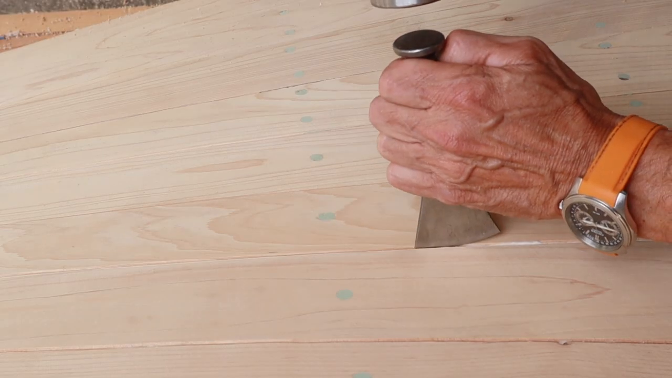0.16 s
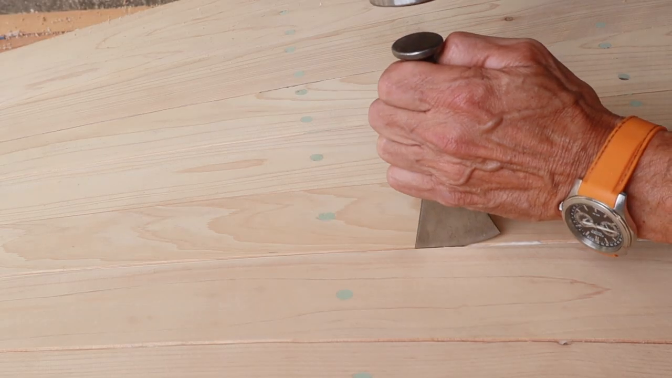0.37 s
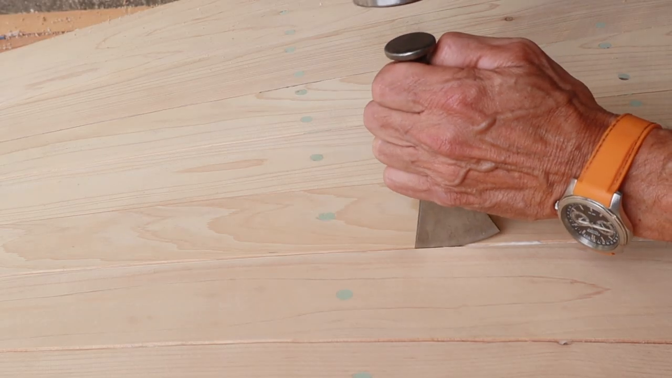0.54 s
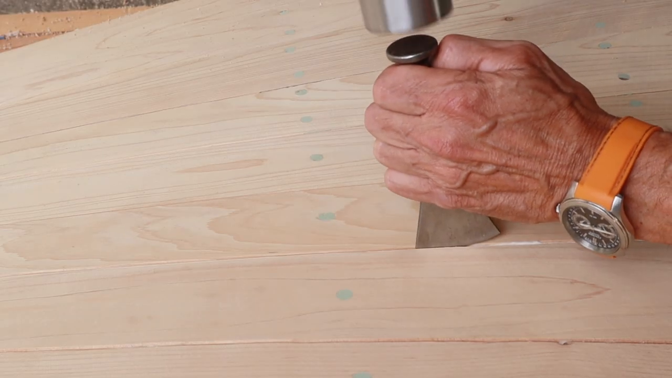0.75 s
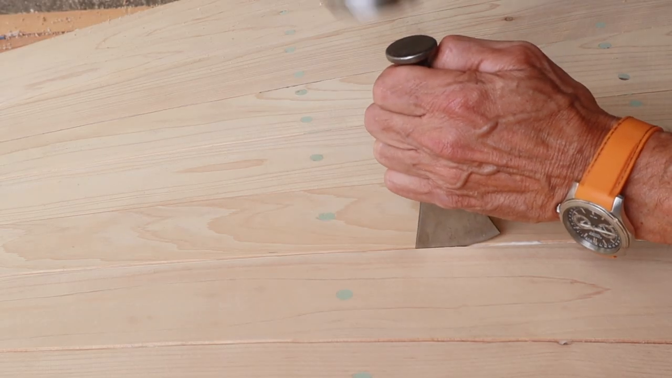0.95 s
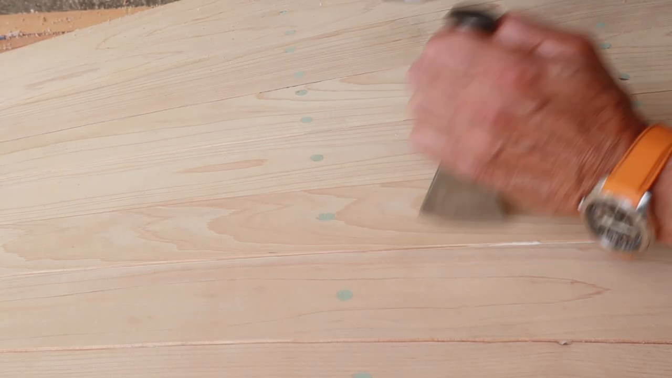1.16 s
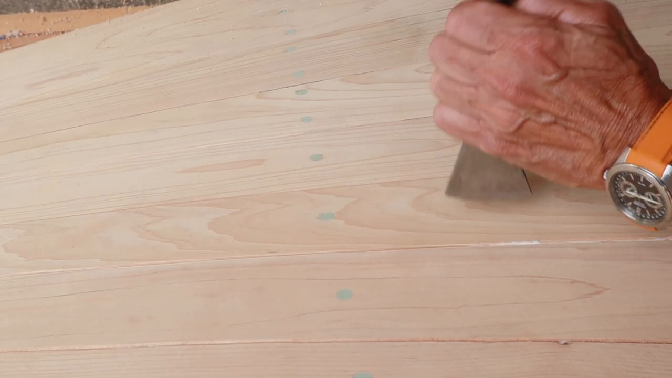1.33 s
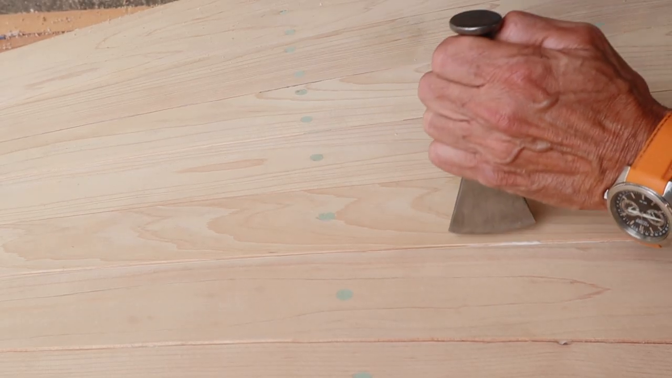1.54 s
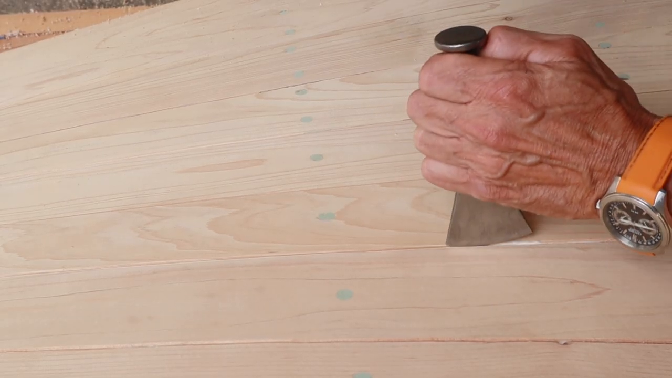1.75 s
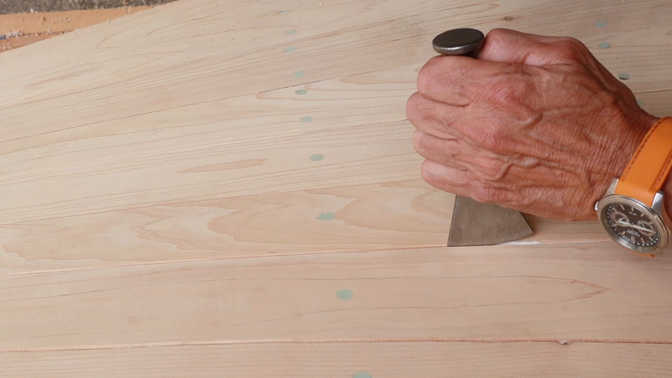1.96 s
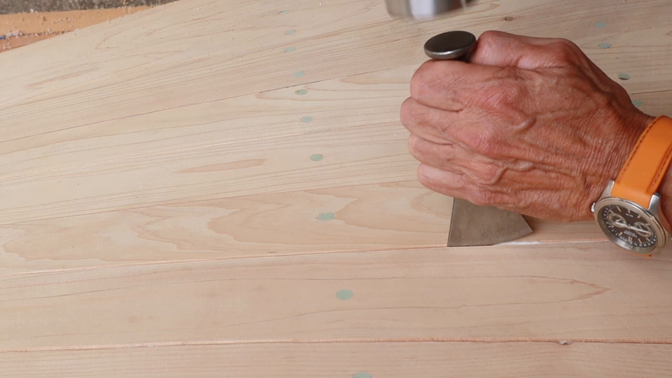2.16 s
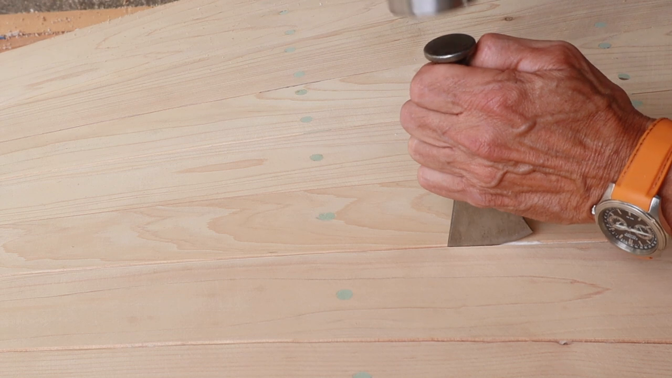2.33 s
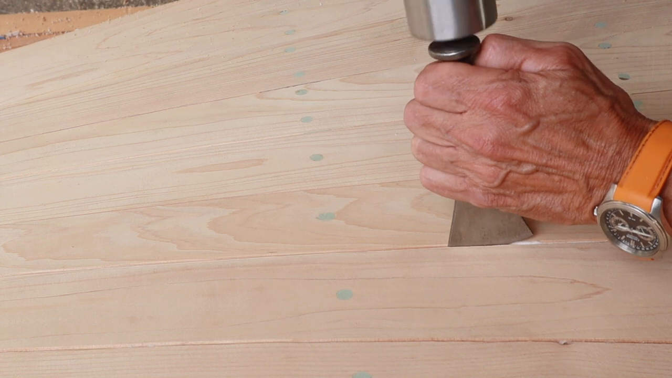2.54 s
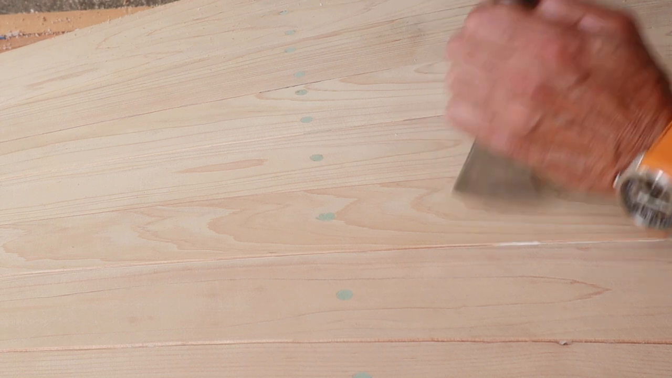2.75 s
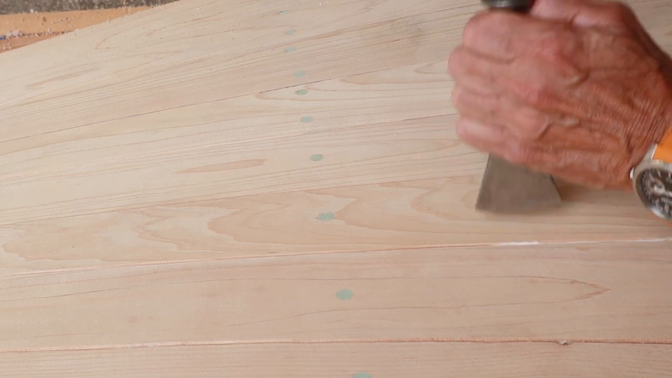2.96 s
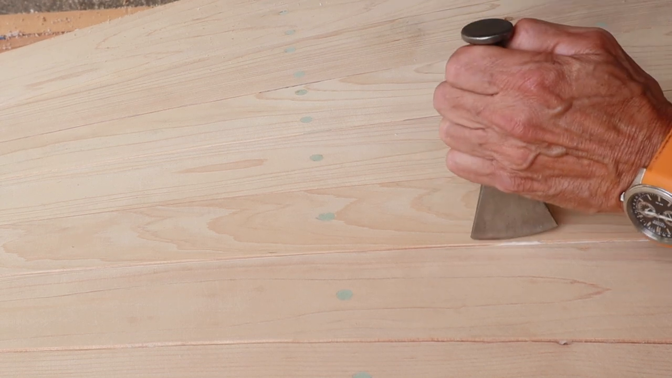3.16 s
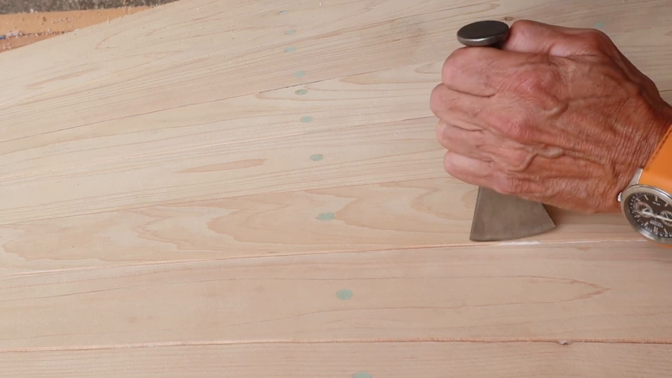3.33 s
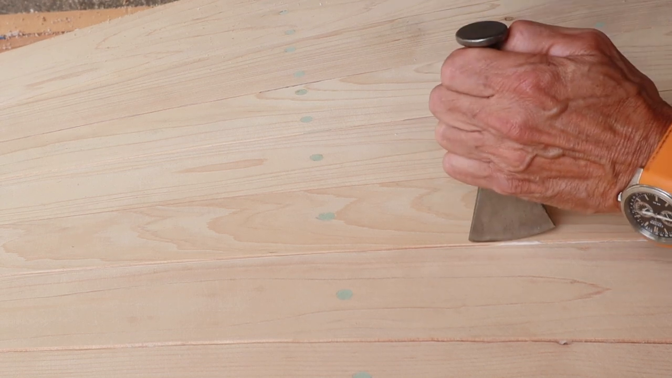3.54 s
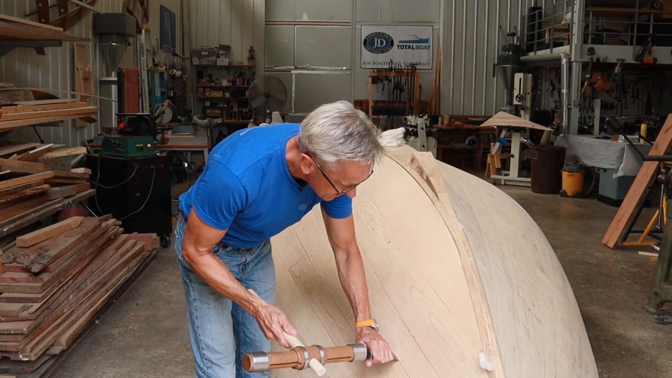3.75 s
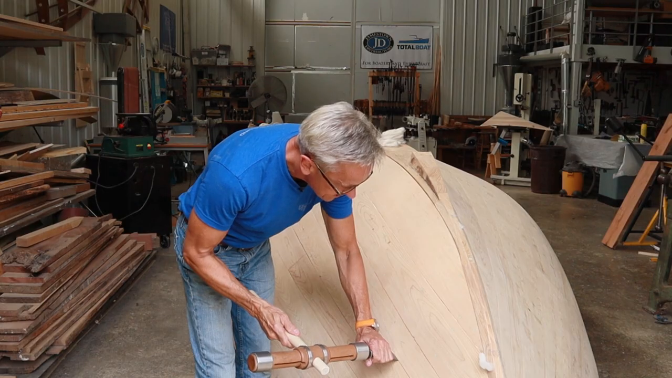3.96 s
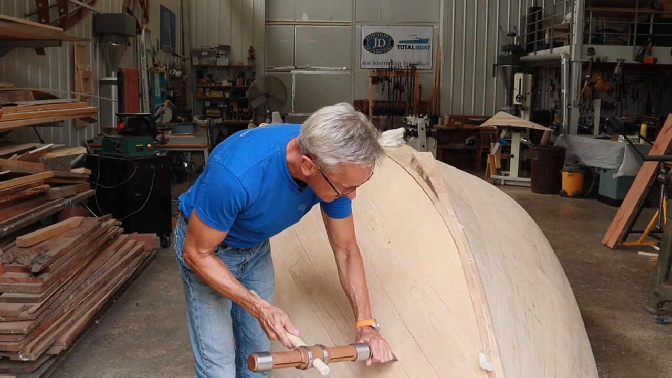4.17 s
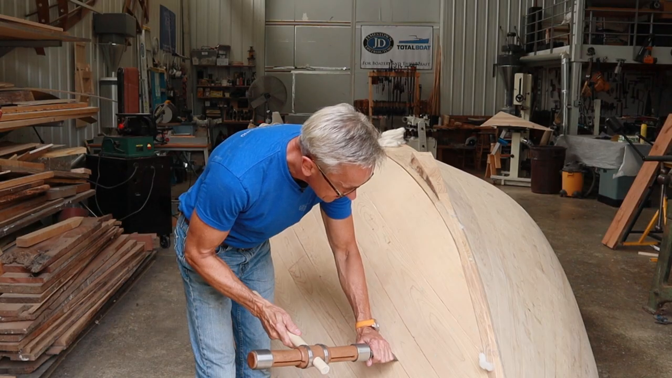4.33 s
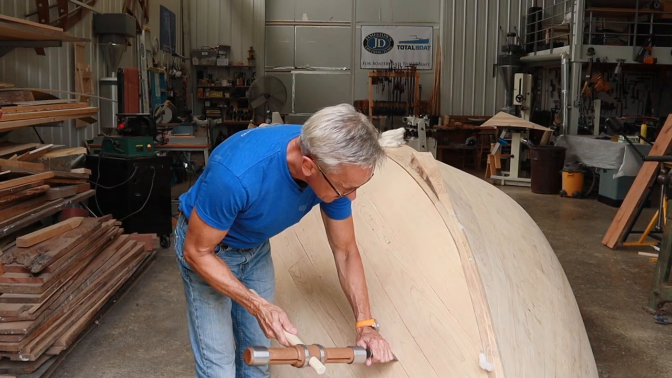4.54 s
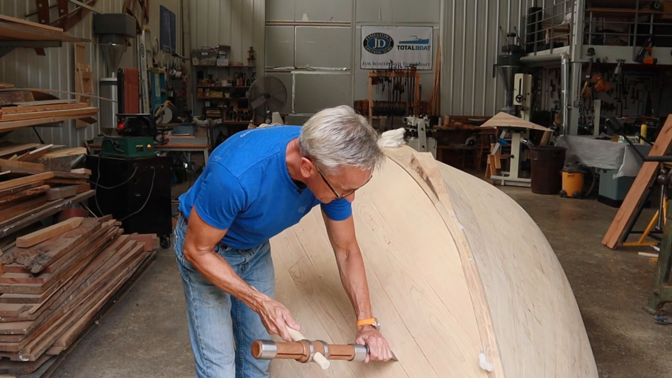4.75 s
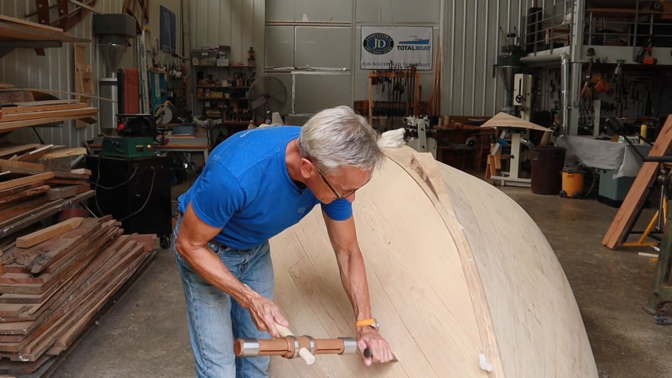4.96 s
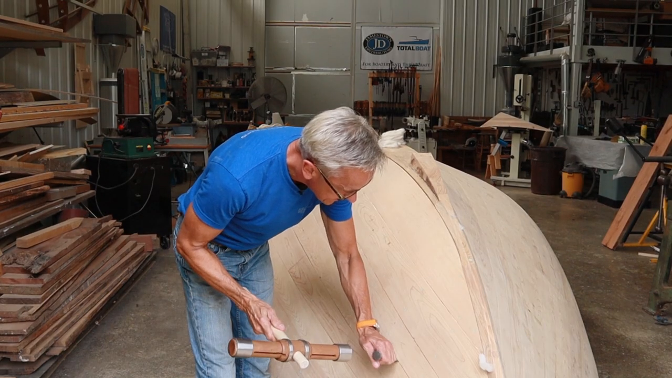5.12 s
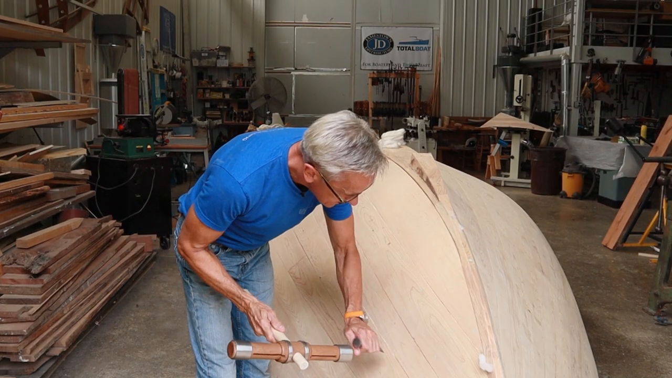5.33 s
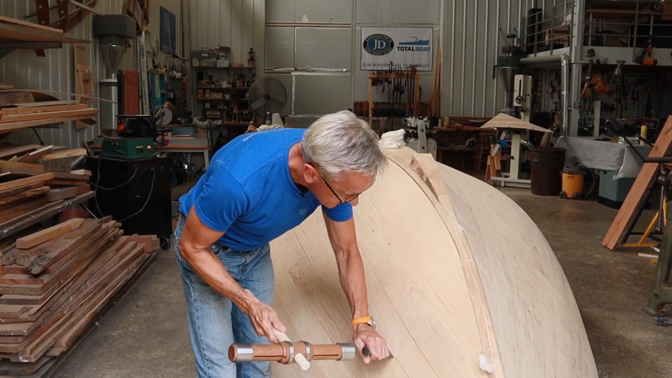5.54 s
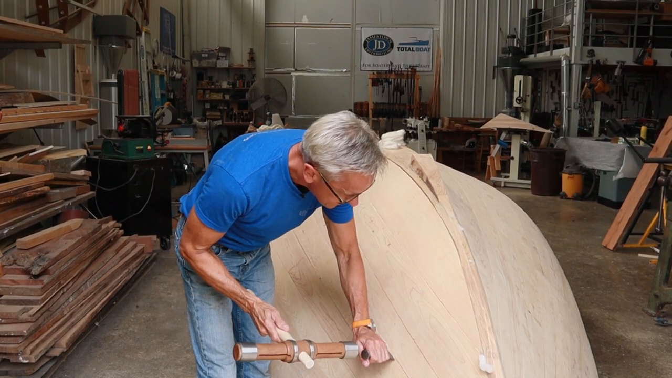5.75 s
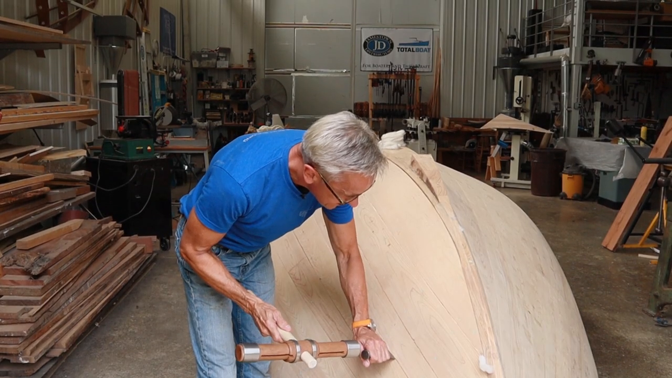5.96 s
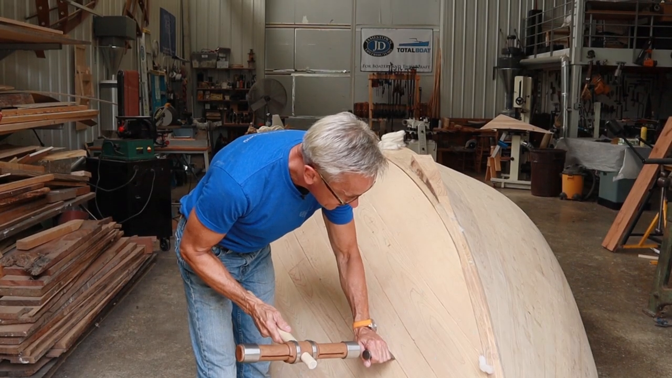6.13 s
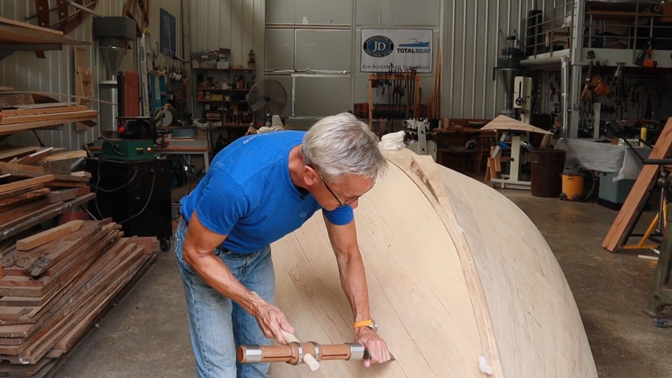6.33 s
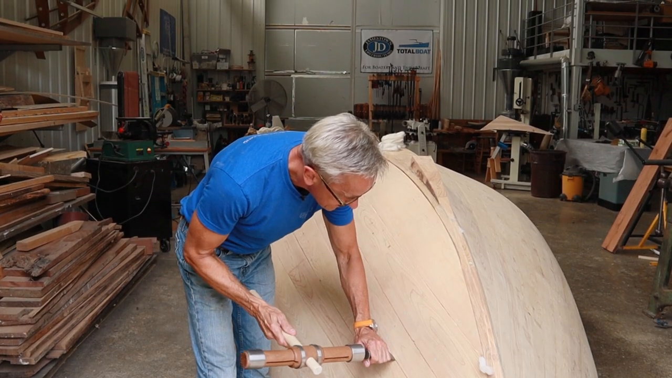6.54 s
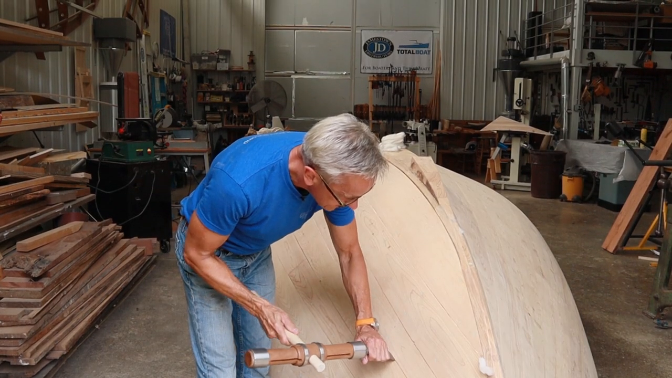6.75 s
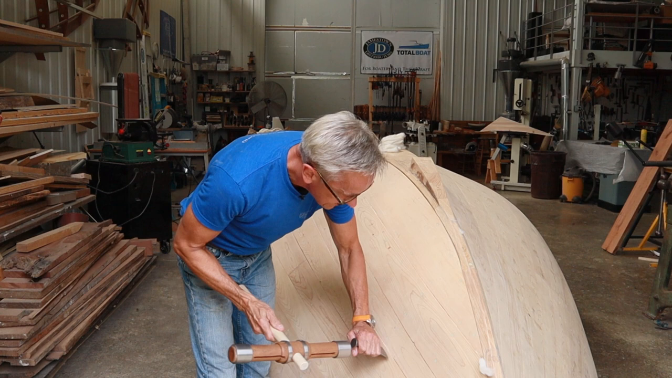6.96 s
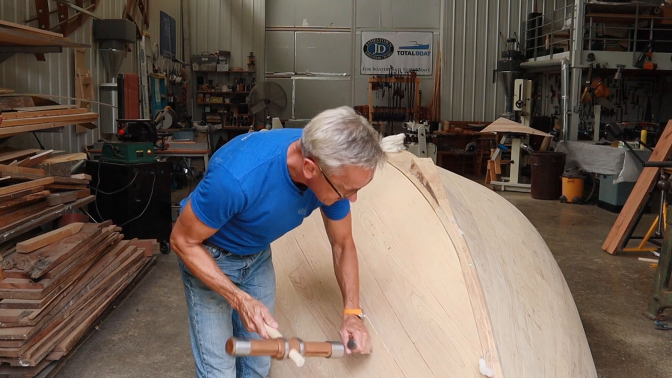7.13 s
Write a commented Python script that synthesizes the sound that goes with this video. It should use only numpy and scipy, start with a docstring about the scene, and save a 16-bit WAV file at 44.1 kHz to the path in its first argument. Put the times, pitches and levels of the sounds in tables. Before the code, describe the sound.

Four pairs of sharp metallic-woody knocks boom in a hull, with soft tool set-downs between; halfway they turn duller, drier, and faint hiss joins.

```python
"""A steel-ringed wooden mallet drives a steel iron into the seam of a wooden hull: four double taps, light then hard.
Each blow is a sum of dying notes and bursts of noise: iron and mallet ring, planks knock, the hollow hull booms.
The shop answers with a dull slap and a fading tail. Before each pair the iron is set down on the seam, a soft knock.
Two motors, made of sine waves, hum and beat together; coloured noise makes still air, a brief draught and a whine.
Halfway the listening position changes: the blows turn duller and drier, and a high hiss of noise joins."""
import sys
import numpy as np
from scipy import signal
from scipy.fft import rfft, irfft
from scipy.io import wavfile
from scipy.ndimage import uniform_filter1d

SR = 44100
rng = np.random.default_rng(int(sys.argv[2]) if len(sys.argv) > 2 else 0)


def inscribe(sig):
    """Save sig as 16-bit PCM at rate SR to the path in sys.argv[1].

    A 1-D sig is mono; a 2-D sig holds one channel per row.
    Samples are clipped to [-1, 1] before scaling.
    """
    pcm = np.round(np.clip(np.atleast_2d(sig).T, -1, 1) * 32767)
    wavfile.write(sys.argv[1], SR, pcm.astype(np.int16))


N = 317210

# Mallet blows. Each row: start in seconds, force in dB, hull boom in dB, iron ring in dB, clack pitch in Hz,
# clack strength in dB, iron tuning as a ratio, pitch of the unstruck note in Hz, pitch of the ping in Hz.
BLOWS = [(0.7432, -3.5, -10, -2, 2130, 5.5, 1.034, 1910, 5270),
         (1.0588, -1, 1, 6.5, 1540, 7, 1.055, 2614, 6780),
         (2.2865, -7.5, -4, 2.5, 2030, 7, 0.93, 2296, 5140),
         (2.5816, 0, 1.5, 3.5, 1965, 4.5, 1.017, 2440, 6550),
         (4.4425, -7, -4.5, -9, 1450, 4.5, 0.92, 1770, 4380),
         (4.762, 0.5, 4, -2.5, 2051, 5, 0.984, 2400, 4220),
         (6.5024, -3, -1.5, -7, 1860, 5, 1.09, 2240, 2850),
         (6.8005, 1, 4, -3.5, 1428, -1, 1.03, 1860, 4330)]
# The blade set down on the seam. Each row: start in seconds, level in dB, softness cut-off in Hz, room level in dB.
TOUCHES = [(0.2034, -26.5, 564, -6), (0.299, -42, 1106, -10.5), (1.872, -23.5, 843, -5),
           (3.672, -38.5, 598, -15.5), (3.9690, -19.5, 1544, -3.5), (4.041, -21, 323, -1),
           (6.0583, -33.5, 937, -2), (6.118, -35, 349, -10)]
# The short knock of planks, mallet and iron together.
# Each row: pitch in Hz, relative level in dB, time to fall by 60 dB in seconds.
KNOCK_NOTES = [(266.4, -7, 0.11), (379.8, -7, 0.037), (471.6, 3, 0.099), (609, -8, 0.37), (648, -5.5, 0.14),
               (829, -10.5, 0.07), (942, -3.5, 0.09), (1123, -6.5, 0.18), (1410, 4.5, 0.022),
               (1545, -4.5, 0.077), (2150, -8, 0.0993), (2390, -13.5, 0.1), (2860, -13.5, 0.14),
               (3003, -10, 0.13), (3220, -19, 0.29), (4530, -25.5, 0.046), (5020, -30, 0.065),
               (6800, -31, 0.034), (6620, -28.5, 0.094)]
# The long notes of hull, planks and iron.
# Each row: pitch in Hz, relative level in dB, time to fall by 60 dB in seconds.
LONG_NOTES = [(60.7, -13, 0.64), (90.6, 3.5, 0.24), (115, -2, 0.45), (146.5, -9, 0.85), (262.6, -8.5, 0.36),
              (320, -12, 0.22), (395, -13, 0.48), (488, -12.5, 1), (601, -12.5, 0.56), (655, -14, 0.68),
              (806, -9, 0.6), (980, -11.5, 0.13), (1147, -14.5, 0.43), (1410, -16, 0.2), (1494, -24, 0.53),
              (2130, -21, 0.69), (2645, -23.5, 1), (2690, -25.5, 0.57), (2844, -26, 0.91),
              (2995, -26.5, 0.42)]
# The crowd of short-lived plank notes. Each row: frequency in Hz, relative level in dB per Hz.
CLATTER = [(40, -20.5), (90, -3), (200, -7.5), (450, -5), (850, 1), (1450, -10), (1900, -3), (3000, -6.5),
           (3700, -14.5), (6500, -23), (9000, -29), (15000, -40)]
# What the shop sends back. Each row: frequency in Hz, relative level in dB per Hz.
SHOP = [(40, -15.5), (85, 10), (200, -1), (480, 1), (860, -2.5), (1450, -7.5), (1900, -9), (3100, -11.5),
        (3700, -22), (6700, -35.5), (8000, -40.5), (15000, -55.5)]
# How long the shop reverberates. Each row: frequency in Hz, time to fall by 60 dB in seconds.
SHOP_T60 = [(80, .7), (250, 0.85), (600, 0.93), (1500, 0.99), (3000, 1), (5000, 0.9), (7000, 0.83),
            (12000, 0.43)]
# Still air in the shop. Each row: frequency in Hz, relative level in dB per Hz.
AIR = [(25, -16), (55, -1), (150, -2), (250, -4), (550, -6.5), (1000, -11.5), (2000, -21.5), (3300, -29),
       (4800, -25), (6500, -31), (7800, -27.5), (9000, -32), (15000, -32.5)]
# The high hiss. Each row: frequency in Hz, relative level in dB per Hz.
HISS = [(1800, -24), (3200, -23), (3900, -12.5), (5400, -5), (5880, -3), (6200, -3.5), (6800, -9),
        (8000, -16), (10000, -28.5), (14000, -37)]
# A thin whine. Each row: frequency in Hz, relative level in dB per Hz.
WHINE = [(7000, -48), (7950, -17), (8130, 0.5), (8300, -23), (9000, -50.5)]
# Resonances of the gripped iron and the weak places between them, some broad and some narrow.
# Each row: pitch in Hz before the blow's tuning ratio, width in octaves, gain in dB (below zero for a weak place).
IRON = [(786, 0.22, 2.5), (1024.4, 0.067, -6.5), (1405, 0.18, 5.5), (1820, 0.043, -4.5), (2150, 0.017, 3.5),
        (2400, 0.0095, -4), (2930, 0.075, 2.5), (3430, 0.044, -2.5)]
# Partials of the hum. Each row: multiple of the shaft rate (half the hum's pitch), relative level in dB.
HUM_PARTIALS = [(1, -11.5), (2, -0.5), (3, -17.5), (4, -16)]
# The hum swells and fades. Each row: time in seconds, level in dB.
HUM_LEVEL = [(0, -63.5), (2.2, -63), (3.7, -59), (3.85, -71.5), (4.4, -69), (5.35, -55.5), (6.1, -70.5),
             (7.19, -60)]
# The two listening positions. Each holds: room level in dB, ping level in dB, air level in dB.
FIRST_SPOT = (1.8, 8.7, -63)
SECOND_SPOT = (-2, 4.8, -65.5)

# the listening position changes at this time
MOVE_S = 3.74
# a harder blow has a shorter contact and so a brighter tick
TICK_DB, TICK_DB_PER_FORCE_DB = 0.5, 0.93
# the planks under the iron take up the blow along with the hull
PLANK_DB, PLANK_DB_PER_BOOM_DB = 1.04, 0.4252
# a faint scrape gets past the cotton, more of it the firmer the push: dB at a 1 kHz cut-off
SCRAPE_DB, SCRAPE_DB_PER_OCTAVE = -24, 6
# the hiss sets in at the second position and slowly sinks
HISS_DB, HISS_SAG_DB_PER_S = -60, 2
# a draught at the start holds, then dies away; it also lifts the sound of the air
DRAUGHT_DB, DRAUGHT_HOLD_S, DRAUGHT_FALL_DB_PER_S, DRAUGHT_LIFT_DB = -55.5, 0.19, 50, 4
# the humming motor and a slower one that beats against it
HUM_HZ, SLOW_MOTOR_HZ, SLOW_MOTOR_DB = 156.2, 152.7, -6

TOP_HZ = 15800  # the finished sound is cut off above this
RING_N = 49152  # samples kept for each knock and its echo
AGE = np.arange(RING_N) / SR  # seconds since the knock began
FREQ = np.maximum(np.arange(RING_N // 2 + 1) * SR / RING_N, 1)
TIME = np.arange(N) / SR


def undb(db):
    """Turn decibels into a gain."""
    return np.exp(np.asarray(db) * np.log(10) / 20)


def along(table, hz):
    """Read between (Hz, value) points on a log-frequency axis."""
    points_hz, value = np.transpose(table)
    return np.interp(np.log(np.maximum(hz, 1)), np.log(points_hz), value)


def noise(spectrum, size):
    """Noise of the given colour, scaled to an rms of one."""
    hz = np.arange(size // 2 + 1) * SR / size
    white = rng.standard_normal(size)
    coloured = irfft(rfft(white) * undb(along(spectrum, hz)), size)
    return coloured / coloured.std()


def colour(sound, db):
    """Filter with the given gain at each of FREQ, without sounding before its input."""
    cepstrum = irfft(np.log(undb(db)))
    # folding the second half onto the first gives the minimum-phase filter
    cepstrum[1:RING_N // 2] *= 2
    cepstrum[RING_N // 2 + 1:] = 0
    return irfft(rfft(sound) * np.exp(rfft(cepstrum)))


def bump(hz, octaves):
    """A bell shape of height one on the log-frequency axis."""
    return np.exp(-np.minimum(0.5 * (np.log2(FREQ / hz) / octaves) ** 2, 20))


def above(hz, order):
    """A smooth step from 0 to 1 around hz, steeper for a higher order."""
    return 1 - 1 / (1 + (FREQ / hz) ** order)


def walk(rate):
    """Slow random wandering with a spread of one; rate is in new values per second."""
    k = int(SR / rate)
    steps = np.repeat(rng.standard_normal(N // k + 1), k)[:N]
    smooth = uniform_filter1d(uniform_filter1d(steps, k), k)
    return smooth / smooth.std()


def add(track, s, sound):
    """Mix a sound into the track at time s."""
    i = int(s * SR)
    track[i:i + len(sound)] += sound[:len(track) - i]


def gust():
    """Strength of the draught: it holds at one, then dies away."""
    return undb(-DRAUGHT_FALL_DB_PER_S * np.maximum(TIME - DRAUGHT_HOLD_S, 0))


def still_air():
    """Low-heavy noise of the air, lifted by the draught and set by the listening position."""
    spot_db = np.where(TIME >= MOVE_S, SECOND_SPOT[-1], FIRST_SPOT[-1])
    air_db = spot_db + DRAUGHT_LIFT_DB * gust()
    return noise(AIR, N) * undb(air_db + 0.71 * walk(4.4))


def draught():
    """Moving air on the microphone: a deep, uneven rumble that soon dies away."""
    rumble = noise([(8, -1.5), (22, -5.5), (45, -5.5), (120, -39.5), (600, -82)], N)
    return rumble * gust() * undb(DRAUGHT_DB + 2 * walk(12))


def whine():
    """A very faint, narrow band of high noise."""
    return noise(WHINE, N) * undb(-87)


def motors(waver=0.004, slow_waver=0.022, flutter_db=1.0):
    """A motor hums in multiples of its shaft rate; a second, less even motor beats against it."""
    # pi rather than 2 pi: the shaft turns at half the hum's pitch
    shaft = np.pi * np.cumsum(HUM_HZ * (1 + waver * walk(9.2))) / SR
    hum = sum(undb(db) * np.sin(k * shaft) for k, db in HUM_PARTIALS)
    slow_hz = SLOW_MOTOR_HZ * (1 + slow_waver * walk(15))
    slow = np.sin(2 * np.pi * np.cumsum(slow_hz) / SR)
    level_db = np.interp(TIME, *np.transpose(HUM_LEVEL)) + flutter_db * walk(23)
    # the square root of 2 gives a full-size sine an rms of one
    return np.sqrt(2) * undb(level_db) * (hum + undb(SLOW_MOTOR_DB) * slow)


def ring(modes, detune, scatter_db, spread_s):
    """Notes that die away; pitch, strength and arrival vary with the spot that is struck."""
    out = np.zeros(RING_N)
    for hz, db, t60 in modes:
        pitch, strength = rng.standard_normal(2)
        age = AGE[AGE < t60]
        decay = np.exp(-np.log(1000) * age / t60)
        note = decay * np.sin(2 * np.pi * hz * (1 + detune * pitch) * age)
        add(out, spread_s * rng.random(), undb(db + scatter_db * strength) * note)
    return out


def diffuse(spectrum, t60s):
    """Countless overlapping notes: noise whose bands each die at their own rate."""
    hz, s, frames = signal.stft(noise(spectrum, RING_N), SR)
    decay = np.exp(-np.minimum(np.log(1000) * s / along(t60s, hz)[:, None], 20))
    return signal.istft(frames * decay, SR)[1][:RING_N]


def knock(crest_s=0.005, crest_width_s=0.0017, crest_db=4, rise_s=0.0015):
    """Iron and planks answer a blow; the sound crests a few milliseconds after contact."""
    tone = undb(-18.5) * ring(KNOCK_NOTES, detune=0.0093, scatter_db=0.5, spread_s=0.004)
    clatter_t60 = [(200, 0.23), (700, 0.17), (1600, 0.075), (3500, 0.069), (9000, 0.031)]  # Hz, seconds
    clatter = undb(-11.5) * diffuse(CLATTER, clatter_t60)
    crest = undb(crest_db * np.exp(-0.5 * ((AGE - crest_s) / crest_width_s) ** 2))
    return (tone + clatter) * crest * (1 - np.exp(-AGE / rise_s))


def shop(direct, room_db, build_s=0.0045, wall_s=0.043, wall_db=-15, wall_hz=3000,
         notes_db=5, note_octaves=0.005):
    """One dull slap from a wall, and a diffuse tail in which the notes of the knock stand out."""
    tail = undb(-22.5) * diffuse(SHOP, SHOP_T60) * (1 - np.exp(-AGE / build_s))
    notes = sum(bump(hz, note_octaves) for hz, _, _ in KNOCK_NOTES if hz < 4000)
    late = np.interp(AGE - wall_s, AGE, direct, left=0)
    slap = colour(late, -14 * above(wall_hz, order=4))
    return undb(room_db) * (colour(tail, notes_db * notes) + undb(wall_db) * slap)


def blade():
    """Setting the iron on the cotton is a soft push: the same kind of knock, dull and without boom."""
    out = np.zeros(N)
    for s, db, soft_hz, room_db in TOUCHES:
        direct = knock(crest_s=0.0023, crest_db=3.5, rise_s=0.0013)
        scrape_db = SCRAPE_DB + SCRAPE_DB_PER_OCTAVE * np.log2(soft_hz / 1000)
        scrape = undb(scrape_db) * (1 - above(3000, order=4))
        push = 1 - above(soft_hz, order=9) + scrape
        # the small added gain keeps the logarithm finite
        soft_db = 20 * np.log10(push * above(110, order=3) + undb(-47.5))
        add(out, s, undb(db) * colour(direct + shop(direct, room_db), soft_db))
    return out


def mallet(node_db=-13, node_octaves=0.026, ping_octaves=0.046, edge_hz=3400,
           clack_octaves=0.13, clack_in_room=0.58):
    """Grip and point of contact retune the iron, leave one note unstruck and bring out a high ping."""
    out = np.zeros(N)
    for s, force_db, boom_db, iron_db, clack_hz, clack_db, tuning, node_hz, ping_hz in BLOWS:
        room_db, ping_db, _ = FIRST_SPOT if s < MOVE_S else SECOND_SPOT
        tick_db = iron_db + TICK_DB + TICK_DB_PER_FORCE_DB * force_db
        plank_db = PLANK_DB + PLANK_DB_PER_BOOM_DB * boom_db

        direct = knock()
        long_notes = undb(-23) * ring(LONG_NOTES, detune=0.002, scatter_db=1.75, spread_s=0.00064)
        long_notes = long_notes * (1 - np.exp(-AGE / 0.0067))
        # the clack of steel on steel is strongest close by and weaker in the room
        clack = clack_db * bump(clack_hz, clack_octaves)
        lingering = long_notes + shop(direct, room_db)
        sound = colour(direct, clack) + colour(lingering, clack_in_room * clack)

        hull_db = boom_db * (1 - above(140, order=4)) + plank_db * bump(500, 0.83)
        hull_db = hull_db - 26 * (1 - above(34, order=4))  # the hull radiates little deep bass
        # above the iron's strong notes the tick of contact sets the level
        treble = above(edge_hz * tuning, order=30)
        contact_db = iron_db * (above(2200, order=10) - treble) + tick_db * treble
        notes_db = sum(gain_db * bump(hz * tuning, width) for hz, width, gain_db in IRON)
        notes_db = notes_db + node_db * bump(node_hz, node_octaves)
        notes_db = notes_db + ping_db * bump(ping_hz, ping_octaves)
        add(out, s, undb(force_db) * colour(sound, hull_db + contact_db + notes_db))
    return out


def high_hiss():
    """A band of high noise, heard only at the second position and slowly sinking."""
    since_move_s = TIME - MOVE_S
    level_db = HISS_DB - HISS_SAG_DB_PER_S * since_move_s + 0.5 * walk(8.7)
    return noise(HISS, N) * (since_move_s >= 0) * undb(level_db)


def scene():
    """Everything in the shop added together, as one channel."""
    background = still_air() + draught() + whine() + high_hiss()
    return (background + motors() + blade() + mallet())[None]


def record(dry, ceiling=0.93):
    """The recorder rounds peaks near full scale and cuts the top."""
    held = dry / (1 + (dry / ceiling) ** 8) ** (1 / 8)
    low_pass = signal.ellip(10, 0.1, 70, TOP_HZ, fs=SR, output="sos")
    return signal.sosfilt(low_pass, held)


dry = scene()
out = record(dry)
inscribe(out)
```